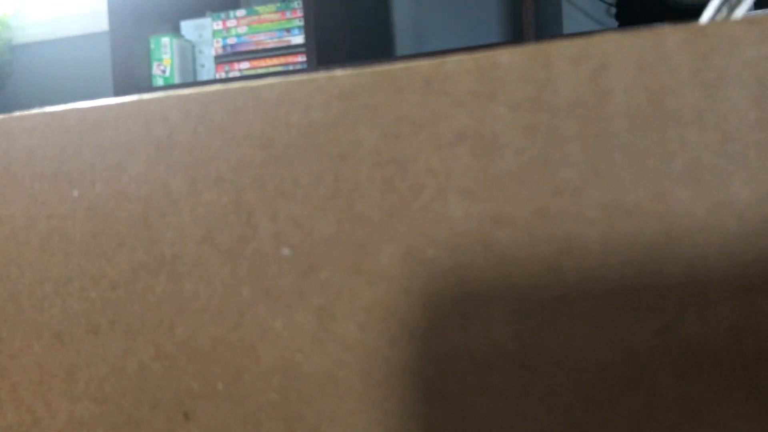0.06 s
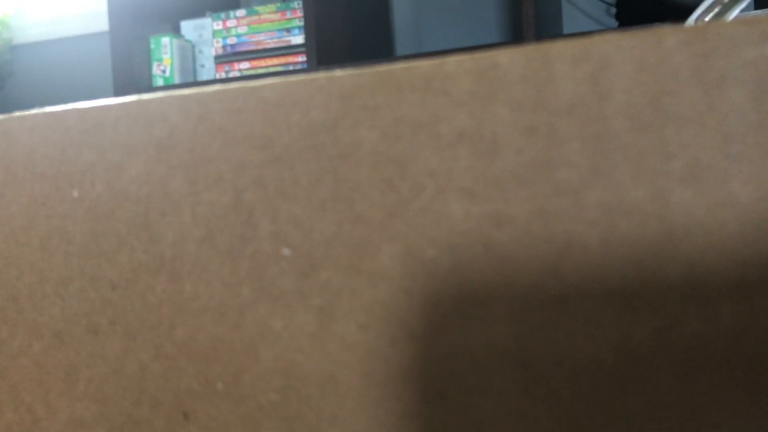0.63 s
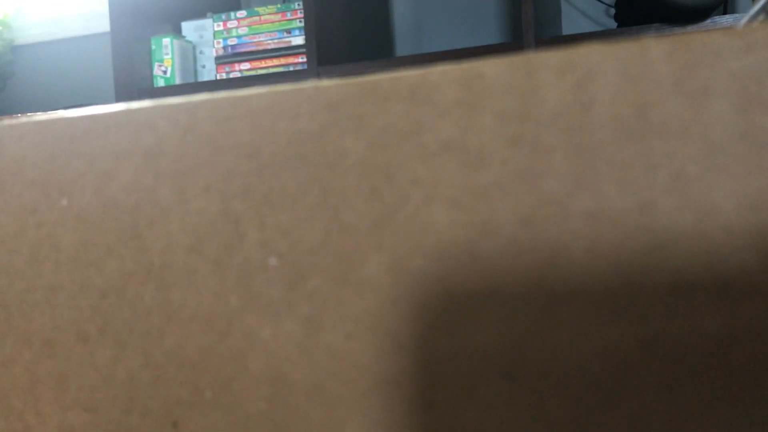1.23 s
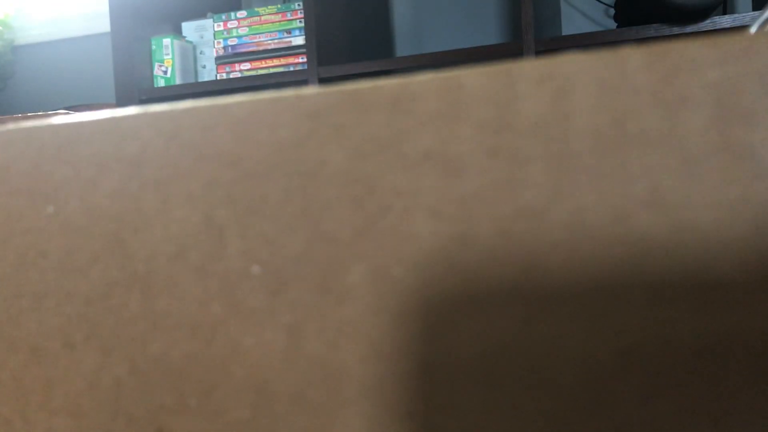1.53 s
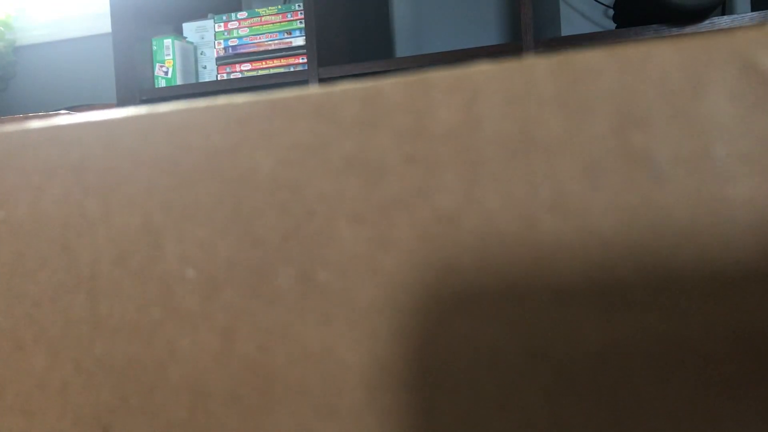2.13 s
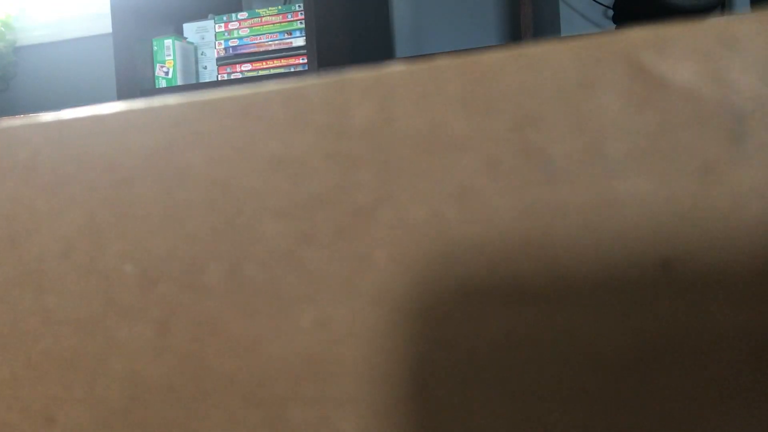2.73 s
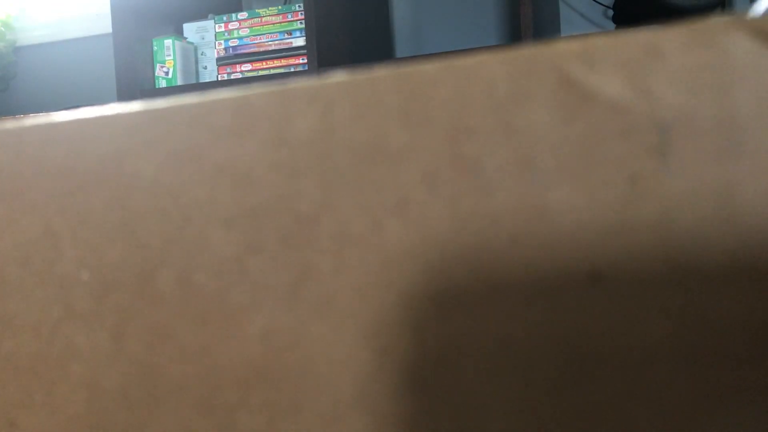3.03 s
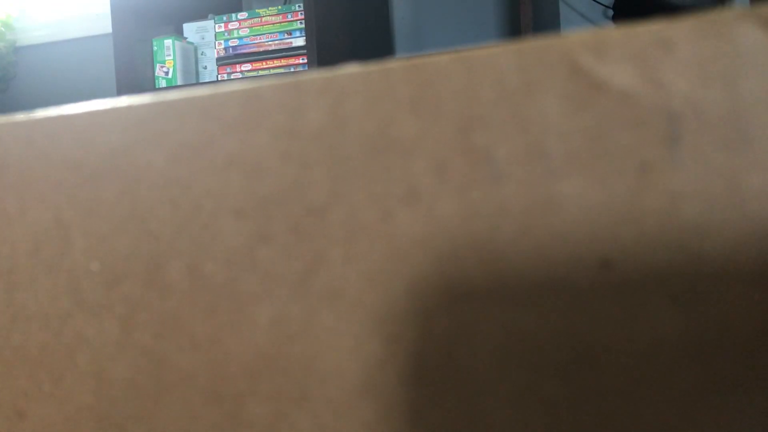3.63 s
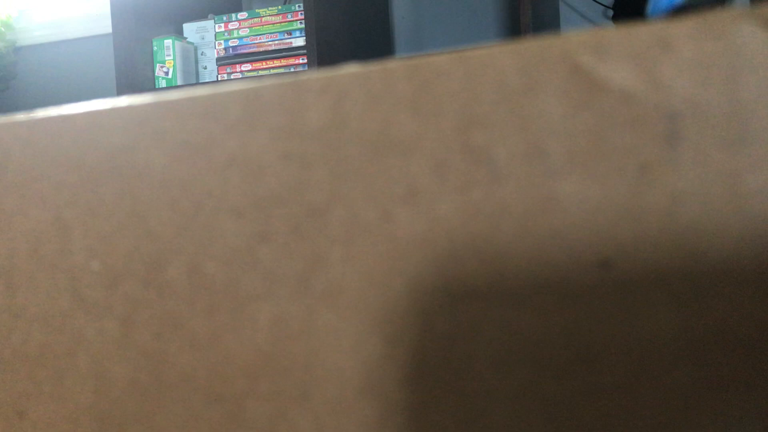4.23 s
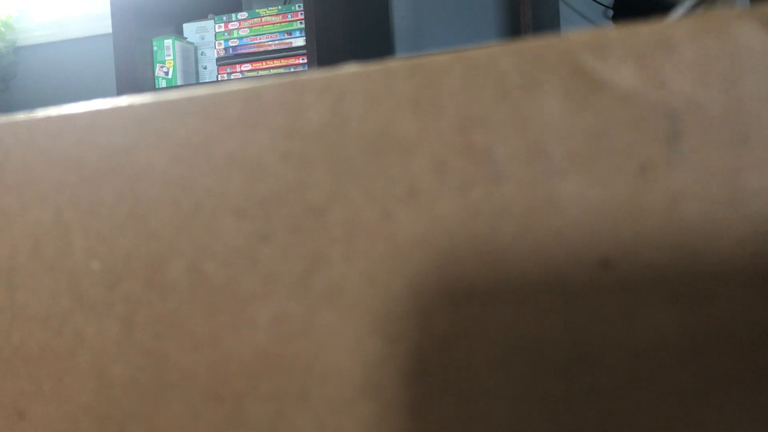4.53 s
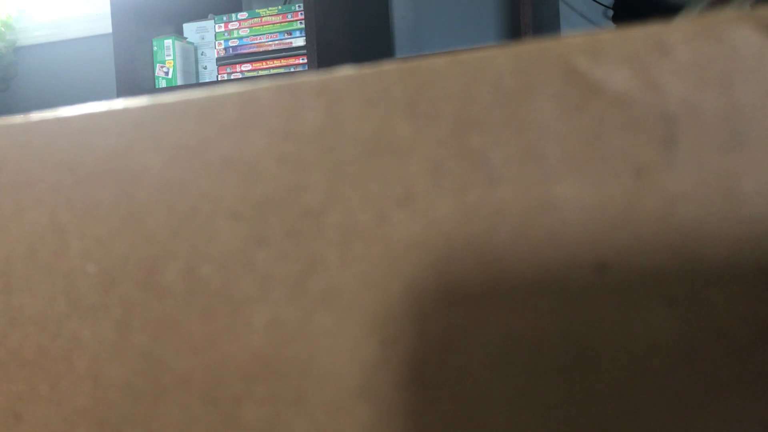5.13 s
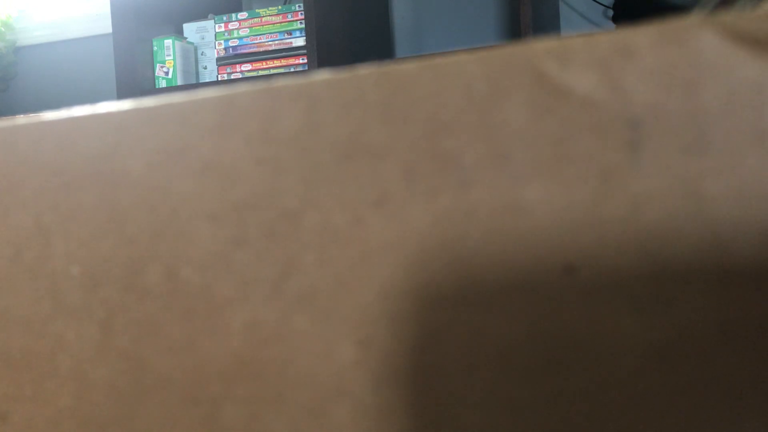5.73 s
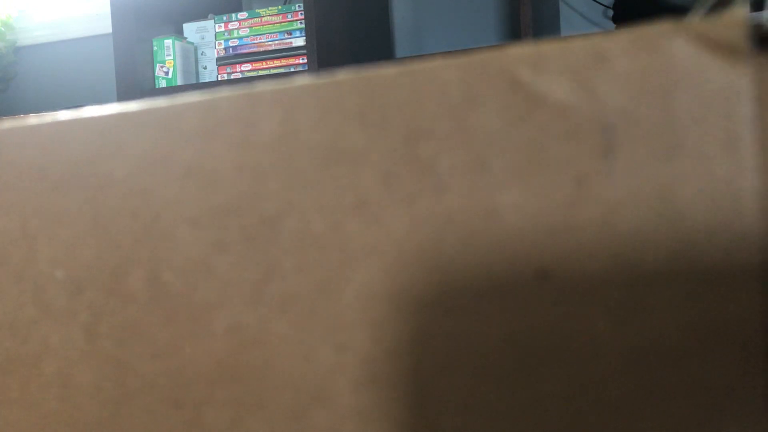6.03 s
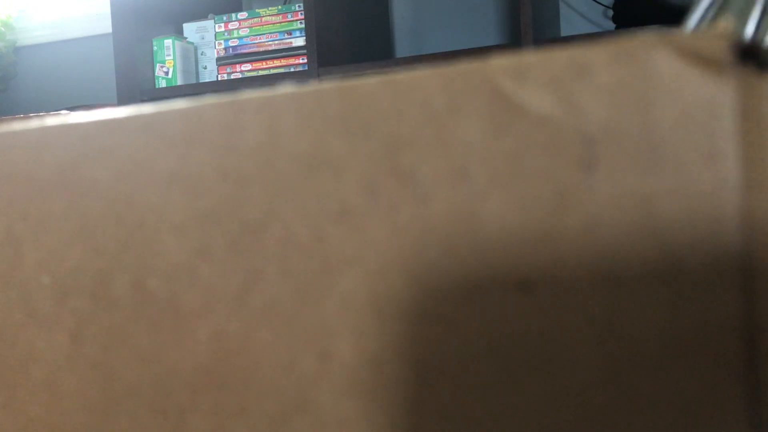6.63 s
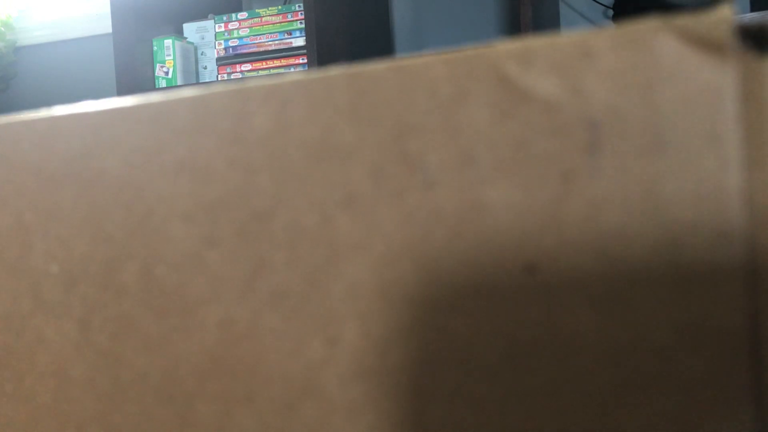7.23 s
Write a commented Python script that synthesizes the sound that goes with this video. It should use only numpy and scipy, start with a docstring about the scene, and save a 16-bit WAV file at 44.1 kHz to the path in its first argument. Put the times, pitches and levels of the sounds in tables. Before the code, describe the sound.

Close up in a small quiet room, a scissor blade scrapes along the taped seam of a cardboard box. After a few soft bumps, it hisses and crackles through the tape, which gives way in a loud double pop with a hollow thud. The steel blades click lightly. A second crackling cut builds to another sharp snap and thud, then a stiff flap flicks and the scraping fades.

```python
"""Scissors slitting box tape

A scissor blade runs along the taped seam of a cardboard box, close up in a small quiet room.
It hisses and crackles through the tape, which parts in sharp snaps and gives way in a loud double pop.
The hollow box thuds when blade or hand jolts it; flaps creak and flick, the steel blades click."""
import sys
import numpy as np
from scipy import signal
from scipy.fft import rfft, irfft
from scipy.io import wavfile
from scipy.ndimage import uniform_filter1d

SR = 44100
rng = np.random.default_rng(int(sys.argv[2]) if len(sys.argv) > 2 else 0)


def generate_wav(signal):
    """Clip the signal to [-1, 1] and save it as 16-bit WAV at the path in sys.argv[1]."""
    frames = np.transpose(np.atleast_2d(signal))
    scaled = np.clip(frames, -1, 1) * 32767
    pcm = np.round(scaled).astype(np.int16)
    wavfile.write(sys.argv[1], SR, pcm)


N = 324855
TIME_S = np.arange(N) / SR

# room tone spectrum, reflection spectrum: f/Hz, gain/dB
ROOM_TONE_COLOUR = [(30, -22.5), (41, -1.5), (55, -0.5), (82, -8), (119, -5), (148, -16), (240, -21.5),
                    (349, -25), (495, -32.5), (4500, -43), (15500, -47)]
ECHO_COLOUR = [(60, -27), (200, -12), (600, -14), (2000, -19), (3100, -17), (4400, -12), (5600, -16.5),
               (7400, -15.5), (8700, -22), (16000, -19.5)]
# room decay: f/Hz, t60/s
ROOM_DECAY = [(100, 0.56), (500, 0.1), (1500, 0.39), (5000, 0.25), (9000, 0.32), (16000, 0.26)]
# friction creaks and pings: t/s, length/s, f/Hz, bandwidth/Hz, level/dB
FRICTION_CREAKS = [(0.361, 0.21, 570, 350, -72.5), (0.464, 0.015, 2810, 800, -72.5),
                   (0.983, 0.0051, 2060, 2200, -67), (0.9932, 0.0028, 2390, 1700, -70.5),
                   (1.571, 0.05, 2150, 650, -70.5), (1.596, 0.031, 3150, 900, -75),
                   (4.616, .04, 1215, 500, -72.5), (7.059, 0.0082, 2110, 350, -65),
                   (7.148, 0.02, 3100, 604, -74), (7.167, 0.013, 3570, 1000, -71)]
# blades clicking, stiff flap flicking off the blade: t/s, level/dB, t60 factor
BLADE_CLICKS = [(3.5738, -62, 0.7), (3.6696, -63.5, 0.5), (3.7099, -54.5, 0.5), (3.9288, -44, 0.9),
                (3.9358, -44, 1)]
FLAP_FLICKS = [(6.7616, -30, 0.83), (6.9062, -46, 1.25)]
# modes of blades, flap and box: f/Hz, level/dB, t60/s
BLADE_MODES = [(4200, -2, 0.004), (5750, 0, 0.007), (8900, -4, 0.004), (11800, -3, 0.006),
               (15400, -3, 0.007)]
FLAP_MODES = [(680, -8.5, 0.017), (870, -2, 0.01), (1060, 3, 0.013), (1390, -10, 0.029), (1985, -5, 0.017),
              (5630, -10, 0.0081)]
BOX_MODES = [(59, 7, 0.07), (101, 2.5, 0.11), (122.6, 2.5, 0.13), (167.9, 8.5, 0.03), (230, 2.5, 0.063),
             (318, -3.5, 0.046), (376.7, 0.5, 0.053), (463, -2.5, 0.05), (640, -3, 0.041), (756, -4, 0.02),
             (942, -2, 0.027), (1140, 1, 0.017), (1380, -1.5, .013), (1777, -4, 0.012)]
# jolts of the box: t/s, panel level/dB, boom re panels/dB, edge re panels/dB
BOX_JOLTS = [(0.102, -37.5, 3, -9), (.112, -44, 7, -34), (.178, -44, -8, -8), (0.893, -48.5, 1, -15),
             (1.243, -49.5, -27, -6), (2.236, -42, -7, -40), (2.366, -50, 7, -14), (3.018, -51, -11, 7),
             (3.0414, -43.5, -9, 4.5), (3.0569, -19.5, -31, 0), (3.0631, -15, -12.5, -22),
             (4.454, -44, -16, -11), (4.469, -39, -4.5, -16.5), (4.741, -46.5, -3.5, -10),
             (4.977, -43.5, -11, -8), (5.0151, -48, -1, 11), (5.043, -50, -26, 10), (5.2719, -33, -24, 4.5),
             (6.183, -47, 3, -4.5), (6.333, -41, 5.5, -13.5), (6.574, -30.5, -28, 7),
             (6.5822, -17.5, -19, -16.5), (6.586, -26, 0.5, 4), (6.592, -33, 17.5, -33),
             (6.797, -46.5, -15, 0)]
# blade pushes: peak t/s, swell/s, fade/s, hiss level/dB, rub level/dB, grain spread/dB, paper share
BLADE_STROKES = [(0.151, 0.029, 0.034, -68.5, -65, 4, 1), (.42, 0.12, 0.19, -83, -71.5, -1.5, 0.6),
                 (1.68, 0.66, 0.25, -78.5, -70.5, 3, 0.86), (1.91, 0.26, 0.22, -59.5, -60.5, -1, 0.4),
                 (2.199, 0.056, 0.078, -74, -69.5, 4, 0.7), (2.39, 0.14, 0.06, -77.5, -67, 1.5, 0.5),
                 (2.637, 0.098, 0.18, -56.5, -57, 2, 0.1), (2.87, 0.17, 0.18, -65, -61, 6.5, 0.36),
                 (3.329, 0.075, 0.058, -71, -60.5, 3.5, 1), (3.915, 0.042, 0.06, -63.5, -83, 3.5, 0.65),
                 (4.659, 0.09, 0.6, -80.5, -73, 0, 0.88), (5.24, 0.036, 0.053, -74.5, -64, 1.5, 0.16),
                 (5.361, 0.053, 0.027, -64, -67, 3, 0.07), (5.482, 0.056, 0.042, -61.5, -61.5, 4, 0.76),
                 (5.56, 0.093, 0.08, -58.5, -61.5, 2, 0.92), (5.65, 0.06, 0.084, -56, -59, 6.5, 0.7),
                 (5.85, 0.15, 0.23, -66, -59.5, 2, 0.4), (6.071, 0.1, 0.17, -69, -62, 1.5, 0.8),
                 (6.252, 0.07, 0.022, -64.5, -58.5, 0.5, 0.8),
                 (6.326, 0.038, 0.067, -64.5, -55.5, 3.5, 0.92), (6.6, 0.089, 0.087, -60, -55.5, 1, 0.77),
                 (6.72, 0.054, 0.049, -59, -57.5, 1, 0.8), (6.79, 0.1, 0.073, -62.5, -53, -4, 0.5),
                 (7.051, 0.084, 0.1, -68.5, -75, 2.5, 1)]
# spectra of rubbed cardboard, cut tape, cut paper, snap and pop: f/Hz, gain/dB
CARDBOARD_COLOUR = [(60, -9), (170, 8.5), (300, 0.5), (480, -5), (800, -3.5), (1200, -4), (1800, -10),
                    (6000, -22), (16000, -39)]
TAPE_CUT_COLOUR = [(500, -22), (2000, -13), (3700, -8), (4900, -14), (6100, -9), (7700, -11), (8450, 2),
                   (9200, 0), (10300, -13), (12300, -6), (13800, -15), (16000, -18)]
PAPER_CUT_COLOUR = [(500, -15), (2300, -6), (2850, 0), (3300, -5), (3900, 1), (4900, -4), (5800, 1),
                    (7600, -2), (8600, 3), (10200, -9), (11300, -4), (13500, -12), (16000, -15)]
TAPE_SNAP_COLOUR = [(200, -28), (800, -13), (2000, -9), (2950, -5), (3700, -7), (4900, -8), (5700, -2.5),
                    (6400, -4), (7400, -2), (8500, 3), (9200, -1), (10200, -14), (12500, -8), (14000, -18),
                    (16000, -22)]
TAPE_POP_COLOUR = [(200, -15), (1000, -12), (1850, -14), (2300, -4), (3000, 0), (4550, -10), (5450, 4),
                   (6000, -4), (9000, -10), (16000, -23)]
# snapping fibre re cutting hiss, slightly thinner, with a duller top: f/Hz, gain/dB
FIBRE_COLOUR = [(1000, -2), (3000, 0.5), (11500, 1), (16000, -11)]
# larger snaps of tape and paper, taut tape bursting: t/s, level/dB, low body/dB, top sizzle/dB
TAPE_SNAPS = [(0.1518, -56, 15, -17), (1.2312, -61, 17, -8), (1.3255, -61.5, 12, 1), (1.9152, -50, -4, 20),
              (2.2386, -59.5, 15, 13), (2.3926, -60, 17, 12), (2.6346, -53, -1.5, 5),
              (2.6504, -41.5, 1, 12), (2.6537, -43.5, -4, 12), (2.6642, -45.5, -9, 4), (2.771, -40, -5, -6),
              (2.8227, -39.5, -3, 4), (2.859, -44, -3.5, 5), (2.8708, -44, -12, 8), (2.883, -46.5, -4.5, 1),
              (2.8932, -48, -2, 4), (2.921, -49, -7, 10), (2.9813, -39, 5, -3), (2.9871, -43, 1.5, -3),
              (2.9931, -54, 1.5, 2), (2.9976, -38, 3, 3), (3.0078, -37.5, 2.5, 2), (3.0185, -37.5, 8.5, 4),
              (3.0425, -38.5, 6.5, -1), (3.0581, -29.5, 9, 6), (3.0606, -26, 9, 4), (3.2769, -53, 20, 9),
              (4.4885, -50, 2.5, -7.5), (5.0155, -42, 4.5, 3), (5.0438, -40.5, -1.5, 6.5),
              (5.21, -53, -2.5, 8.5), (5.2724, -36.5, 3, -5), (5.4102, -58.5, 2, 3), (5.5278, -53, 6, -8),
              (5.5394, -50.5, 9, -5), (5.5609, -52, 0, -2), (5.5769, -50.5, -5, 2), (5.63, -41.5, -12, 4),
              (5.6454, -43.5, -1, -3), (5.6522, -48, 0, 3), (5.6562, -39, 9, 12), (5.6695, -47, -15, -3),
              (5.6864, -39, -6, 3), (5.6955, -50, 7, 0), (5.6988, -35.5, -26, 3), (5.702, -30.5, -1.5, -15),
              (5.7114, -34, -18.5, -1), (5.7453, -50, -5, 0), (5.7807, -44, -5, -11),
              (5.7866, -34, -4.5, -4), (5.849, -46, -6, 1), (5.8947, -55, -12, -5), (5.9002, -46, -1, 5),
              (5.993, -53, 3, -1), (6.036, -42.5, 0, 2), (6.0579, -40.5, -4, 1), (6.2536, -53, -16, 3.5),
              (6.5327, -54.5, 2, 12), (6.575, -36, 0, -12), (6.5816, -33, 6.5, -4), (6.585, -23.5, 3, 11),
              (6.5885, -32, 5, -4), (6.7612, -40.5, 3.5, 4), (6.7975, -45, 11, -10), (6.8376, -48, -3, 2),
              (6.964, -58, 14, -5.5)]
TAPE_POPS = [(3.0657, -16.5, 1, -0.5), (3.0741, -34.5, -5.5, -6.5)]


def amp(db):
    return 10 ** (np.asarray(db) / 20)


def unit(x):
    """Scale to rms 1."""
    return x / np.sqrt(np.mean(x ** 2) + 1e-20)


def burst(x):
    """Scale to the energy of 4 ms at rms 1."""
    return x * np.sqrt(.004 * SR / (np.sum(x ** 2) + 1e-20))


def lookup(points, hz):
    """Interpolate on a log-frequency axis."""
    f, value = np.transpose(points)
    return np.interp(np.log(hz + 1), np.log(f + 1), value)


def add(mix, at_s, sound):
    part = mix[max(round(at_s * SR), 0):][:len(sound)]
    part += sound[:len(part)]


def bins_hz(size):
    return np.fft.rfftfreq(size, 1 / SR)


def wander(count, span):
    """Noise averaged over span samples, rms 1."""
    return unit(uniform_filter1d(rng.standard_normal(count), size=span))


def response(gain_db):
    """Minimum-phase impulse response of a spectrum."""
    cepstrum = irfft(gain_db * np.log(10) / 20)
    half = len(cepstrum) // 2
    cepstrum[1:half] *= 2
    cepstrum[half + 1:] = 0
    return irfft(np.exp(rfft(cepstrum)))


def coloured(x, colour):
    """Filter by a spectrum table, rms 1."""
    return unit(signal.oaconvolve(x, response(lookup(colour, bins_hz(4096))))[:N])


def whiten(x, span_bins=31):
    """Flatten the broad spectrum of a burst."""
    spectrum = rfft(x)
    power = np.abs(uniform_filter1d(abs(spectrum) ** 2, size=span_bins))
    return irfft(spectrum / np.sqrt(power + 1e-12), len(x))


def grains(per_s, spread_db):
    """Random tiny slips, mostly small, at steady mean power."""
    size = amp(spread_db * np.minimum(rng.exponential(1, N), 3.5))
    slips = size * rng.choice([-1, 1], N) * (rng.random(N) < per_s / SR)
    return slips / np.sqrt(np.abs(uniform_filter1d(slips ** 2, size=2000)) + 1e-9)


def room_tone(level_db=-58.5):
    """Low rumble under faint hiss."""
    spectrum = rfft(rng.standard_normal(N)) * amp(lookup(ROOM_TONE_COLOUR, bins_hz(N)))
    return amp(level_db) * unit(irfft(spectrum, N))


def reflections(x, build_s=0.0027, taps_per_s=5000):
    """Dense weak echoes off walls and shelves; each band has its own decay."""
    t = np.arange(SR) / SR
    taps = rng.standard_normal(SR) * (rng.random(SR) < taps_per_s / SR)
    taps *= 1 - np.exp(-(t / build_s) ** 2)
    hz, frame_s, bands = signal.stft(unit(taps), SR, nperseg=256)
    decay_per_s = np.log(1000) / lookup(ROOM_DECAY, hz)[:, None]
    gain = amp(lookup(ECHO_COLOUR, hz))[:, None] * np.sqrt(2 * decay_per_s / SR)
    bands *= gain * np.exp(-decay_per_s * frame_s)
    return signal.fftconvolve(x, signal.istft(bands, SR, nperseg=256)[1])[:N]


def reverb(x, paths=4, split_hz=450, path_s=.0015):
    """Bass takes one echo path; highs scatter over several in turn, leaving a pitchless tail."""
    low = signal.sosfilt(signal.butter(4, split_hz, "low", fs=SR, output="sos"), x)
    high = signal.sosfilt(signal.butter(4, split_hz, "high", fs=SR, output="sos"), x)
    away = abs((TIME_S / path_s + np.arange(paths)[:, None]) % paths - paths / 2)
    crossfades = np.cos(np.pi / 2 * np.minimum(away, 1))
    return reflections(low) + sum(reflections(high * fade) for fade in crossfades)


def creaks(drag=0.19, median_slip_hz=220, slip_s=0.0028, rise=0.016):
    """Uneven stick-slip rings a stiff edge; pitch rises as it tightens."""
    out = np.zeros(N)
    for at_s, length_s, hz, width_hz, db in FRICTION_CREAKS:
        t = np.arange(0, length_s + .01, 1 / SR)
        slips = np.cumsum(median_slip_hz * np.exp(.5 * wander(len(t), span=200))) / SR
        grip = (drag + np.exp(-(slips % 1) / (median_slip_hz * slip_s))) * (t < length_s)
        friction = grip * rng.standard_normal(len(t))
        carrier = np.exp(2j * np.pi * np.cumsum(hz * (1 + rise * t / length_s)) / SR)
        pole = np.exp(-np.pi * width_hz / SR)
        squeak = (carrier * signal.lfilter([1], np.poly([pole, pole]), friction / carrier)).real
        add(out, at_s, amp(db) * unit(squeak) * np.sqrt(t[-1] / length_s))
    return out


def struck(events, modes, grit, contact_db, grit_s=0.0015):
    """A gritty tap rings a stiff part, longer when loosely held."""
    out, t = np.zeros(N), np.arange(SR // 2) / SR
    for at_s, db, t60_factor in events:
        tone = np.zeros(len(t))
        for k, (hz, mode_db, t60_s) in enumerate(modes):
            decay = amp(mode_db - 60 * t / (t60_s * t60_factor))
            tone += (-1) ** k * np.sin(2 * np.pi * hz * t) * decay
        tap = (t == 0) + grit * rng.standard_normal(len(t)) * np.exp(-t / grit_s)
        ringing = burst(signal.fftconvolve(tap, tone)[:len(t)])
        add(out, at_s, amp(db) * (ringing + amp(contact_db) * burst(tap)))
    return out


def box_knocks(gain_db=-0.5, crush=0.096, crush_s=0.0058, scuff_db=-15, scuff_s=0.019, scuff_max_db=-40):
    """A jolt crushes the flutes slightly and rings edges and panels; the box scuffs as it shifts."""
    out, t = np.zeros(N), np.arange(8192) / SR
    hz, mode_db, t60_s = np.transpose(BOX_MODES)
    sign = (-1) ** np.arange(len(hz))
    decay = amp(-60 * t / t60_s[:, None])
    cardboard = response(lookup(CARDBOARD_COLOUR, bins_hz(2048)))
    highpass = signal.butter(1, 600, "high", fs=SR)
    for at_s, db, boom_db, edge_db in BOX_JOLTS:
        spot_hz = hz * (1 + .09 * rng.uniform(-1, 1, len(hz)) * (hz > 400))  # edge modes vary by spot
        modes = np.sin(2 * np.pi * spot_hz[:, None] * t) * decay
        weight = sign * amp(mode_db + lookup([(55, boom_db), (165, 0), (250, 0), (750, edge_db)], hz))
        flutes = signal.lfilter(*highpass, rng.standard_normal(len(t)) * np.exp(-t / crush_s))
        push = (t == 0) + crush * flutes
        thud = signal.fftconvolve(push / np.linalg.norm(push), weight @ modes)
        scuff = signal.fftconvolve(rng.laplace(size=len(t)) * np.exp(-t / scuff_s), cardboard)
        add(out, at_s, amp(db + gain_db) * thud)
        add(out, at_s, amp(min(db + scuff_db, scuff_max_db)) * burst(scuff))
    return out


def strokes(drop_db=15, roundness=1.67):
    """Pushes swell and fade. Returns hiss gain, rub gain, grain spread and paper share over time."""
    peak_s, swell_s, fade_s, hiss_db, rub_db, spread_db, paper = np.transpose(BLADE_STROKES)[:, :, None]
    t = np.arange(0, N / SR, .001)
    away = abs(t - peak_s) / np.where(t < peak_s, swell_s, fade_s)
    effort_db = -drop_db * away ** roundness
    hiss_power = amp(hiss_db + effort_db) ** 2 + 1e-20
    rub_power = amp(rub_db + effort_db) ** 2
    share = hiss_power / hiss_power.sum(0)
    controls = (np.sqrt(hiss_power.sum(0)), np.sqrt(rub_power.sum(0)),
                (share * spread_db).sum(0), np.clip((share * paper).sum(0), 0, 1))
    return [np.interp(TIME_S, t, control) for control in controls]


def rubbing(gain_db=1.5):
    """The flat of the blade drags in gritty slips; the hollow box darkens the scrape."""
    return amp(gain_db) * coloured(grains(per_s=900, spread_db=-2), CARDBOARD_COLOUR)


def slitting(spread_db, paper, gain_db=1, tears_per_s=1800, smooth=0.2, judder_db=3):
    """The edge parts tape and paper: tiny tears over smooth hiss, under a juddering pull."""
    pull = unit(amp(judder_db * np.clip(wander(N, span=150), -2, 2)))
    cut = np.zeros(N)
    for share, colour in ((1 - paper, TAPE_CUT_COLOUR), (paper, PAPER_CUT_COLOUR)):
        tears = grains(tears_per_s, spread_db) + smooth * rng.standard_normal(N)
        cut += np.sqrt(share) * coloured(tears * pull, colour)
    return amp(gain_db) * cut


def fibres(hiss, spread_db, paper, gain_db=8, per_s_per_db=32, scatter_db=5.5, fray=0.22, fray_s=0.00078):
    """Small fibres snap and fray at random, more often as the blade bites coarser."""
    out, t, hz = np.zeros(N), np.arange(512) / SR, bins_hz(1024)
    chance = per_s_per_db * np.maximum(spread_db, 0) / SR
    breaks = hiss * amp(scatter_db * np.clip(rng.standard_normal(N), -2, 2)) * (rng.random(N) < chance)
    tails = signal.oaconvolve(breaks, np.exp(-t / fray_s))[:N]
    crackle = breaks + fray * rng.standard_normal(N) * tails
    crackle *= amp(gain_db) / (2 * np.sqrt(1 + fray ** 2 * fray_s * SR / 2))
    for share, colour in ((1 - paper, TAPE_CUT_COLOUR), (paper, PAPER_CUT_COLOUR)):
        tick = burst(response(lookup(colour, hz) + lookup(FIBRE_COLOUR, hz)))
        out += signal.oaconvolve(np.sqrt(share) * crackle, tick)[:N]
    return out


def snaps(events, colour, patch_db, lead_in=.07, fray=.45, fray_s=.0006, flutter=0.015, flutter_s=0.01,
          repeat=.35, repeat_max_s=.004, thud_db=-13, thud_s=0.0052):
    """Faint noise swells into a snap that frays, rings the tape and tugs the box. Returns direct, send."""
    direct, send, hz = np.zeros(N), np.zeros(N), bins_hz(1024)
    t = np.arange(-256, 1792) / SR
    envelope = np.exp(-abs(t) / fray_s) * np.where(t < 0, lead_in, fray)
    envelope += flutter * np.exp(-abs(t) / flutter_s) * (t >= 0)
    cardboard = response(lookup(CARDBOARD_COLOUR, hz))
    for at_s, db, body_db, top_db in events:
        release = whiten((t == 0) + envelope * rng.standard_normal(len(t)))
        release += repeat * rng.random() * np.roll(release, int(repeat_max_s * SR * rng.random()))
        tilt_db = lookup([(3000, body_db), (5000, 0), (9000, 0), (11500, top_db), (16000, top_db - 3)], hz)
        ripple_db = patch_db * wander(len(hz), span=20)  # each patch of tape rings its own way
        snap = burst(signal.fftconvolve(release, response(lookup(colour, hz) + tilt_db + ripple_db)))
        tug = rng.standard_normal(len(t)) * np.exp(-abs(t) / thud_s) * (t >= 0)
        thud = burst(signal.fftconvolve(tug, cardboard))
        send_db = np.clip(4 * (db + 29), -2.5, 1)  # hard snaps shake more flap, reach more room
        add(direct, at_s + t[0], amp(db) * (snap + amp(thud_db) * thud))
        add(send, at_s + t[0], amp(db + send_db) * snap)
    return direct, send


def scene():
    """Blade, box and tape, plus reverb and room tone; mono."""
    hiss, rub, spread_db, paper = strokes()
    blade = hiss * slitting(spread_db, paper) + fibres(hiss, spread_db, paper) + rub * rubbing()
    blade += struck(BLADE_CLICKS, BLADE_MODES, grit=0.52, contact_db=-15)
    box = box_knocks() + struck(FLAP_FLICKS, FLAP_MODES, grit=0.036, contact_db=-27) + creaks()
    snap, snap_send = snaps(TAPE_SNAPS, TAPE_SNAP_COLOUR, patch_db=3)
    pop, pop_send = snaps(TAPE_POPS, TAPE_POP_COLOUR, patch_db=1.5)
    echo = reverb(box + blade + snap_send + pop_send)
    return (box + blade + snap + pop + echo + room_tone())[None]


def record(dry, low_cut_hz=42, high_cut_hz=16000):
    """Small microphone: bass roll-off, then band limit."""
    thin = signal.sosfilt(signal.butter(3, low_cut_hz, "high", fs=SR, output="sos"), dry)
    lowpass = signal.firwin(255, high_cut_hz, window=("kaiser", 9), fs=SR)
    return signal.oaconvolve(thin, lowpass[None], "same")


dry = scene()
out = record(dry)
generate_wav(out)
```